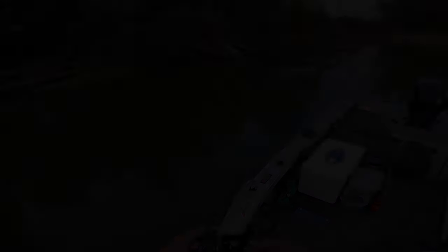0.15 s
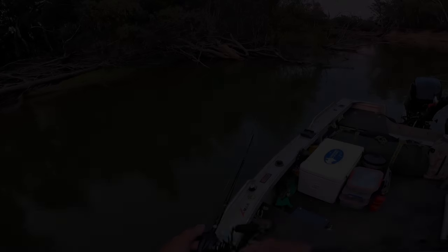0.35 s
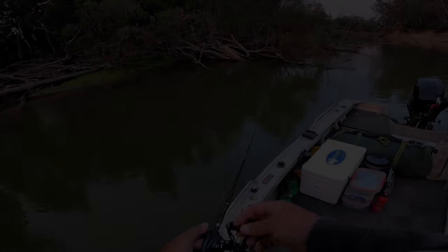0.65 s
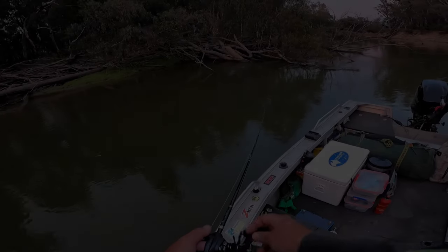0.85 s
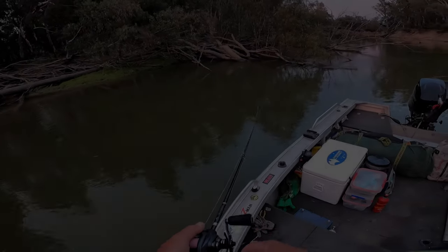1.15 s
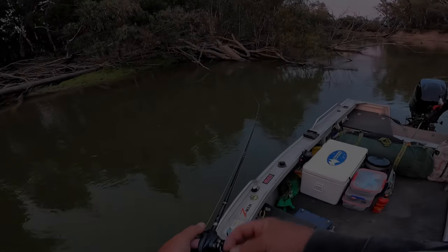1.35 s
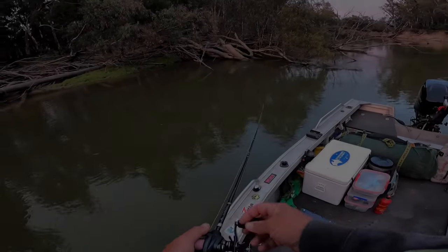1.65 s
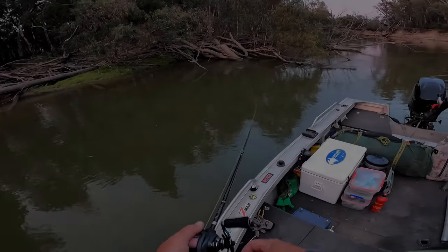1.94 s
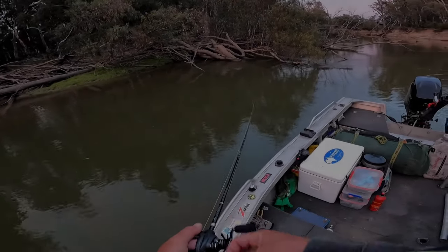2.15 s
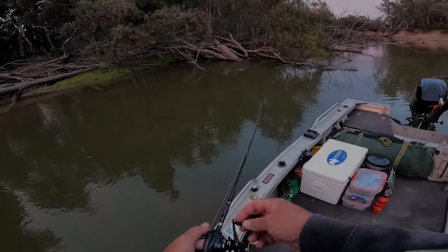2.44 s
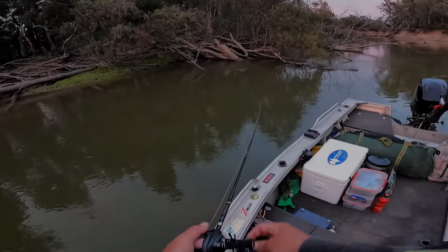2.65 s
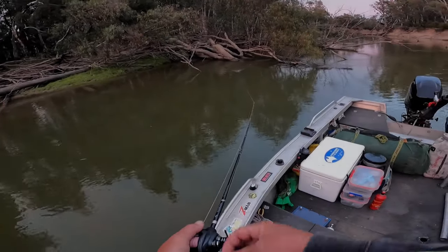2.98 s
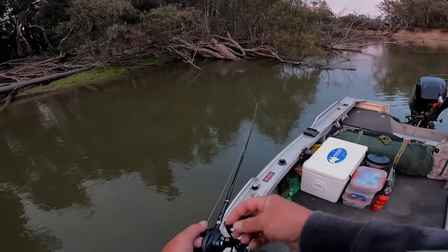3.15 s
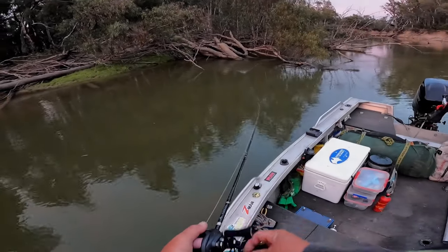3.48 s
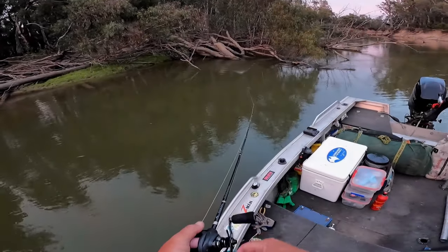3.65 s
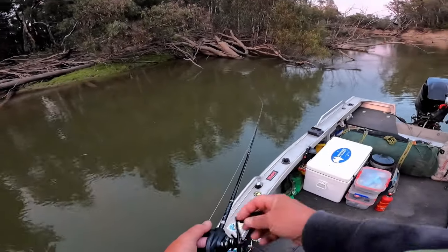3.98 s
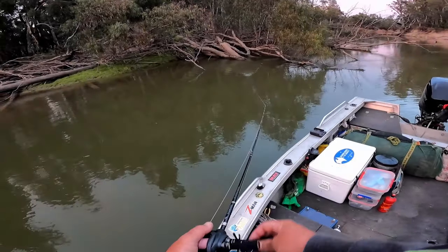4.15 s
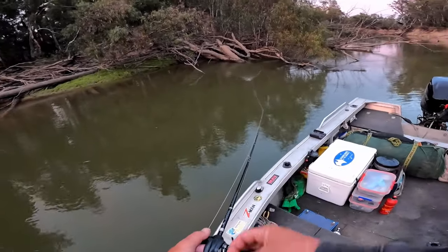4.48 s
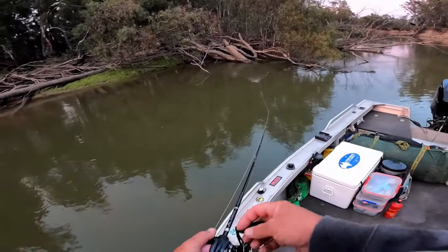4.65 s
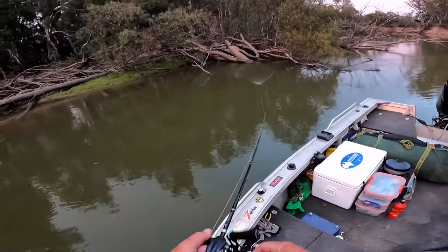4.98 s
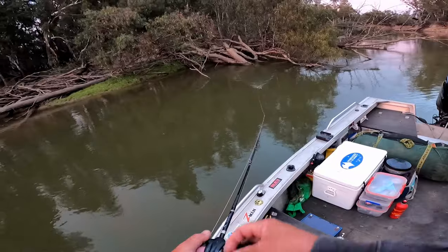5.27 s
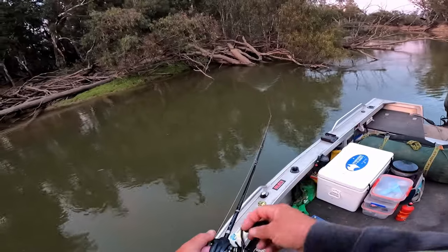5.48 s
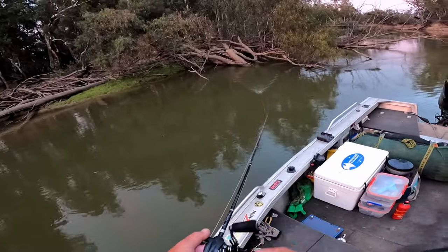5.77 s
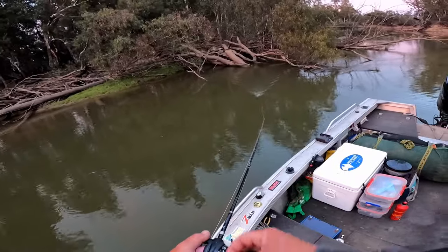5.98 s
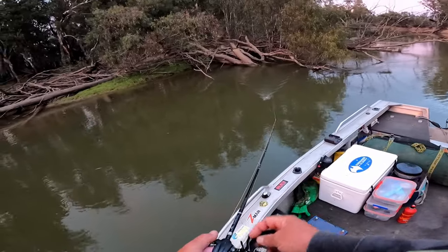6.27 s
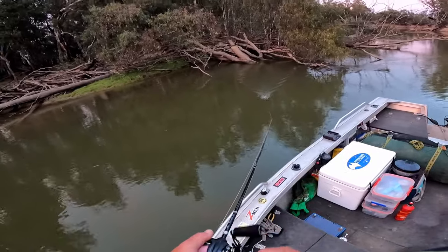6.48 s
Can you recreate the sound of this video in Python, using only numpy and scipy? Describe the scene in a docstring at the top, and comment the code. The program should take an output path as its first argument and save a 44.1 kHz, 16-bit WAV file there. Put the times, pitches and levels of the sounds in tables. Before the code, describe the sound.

A raucous dawn bird chorus rings along a wooded river, with dry reel clicks, soft hull plops, thin whistles and a small bird's rising pips.

```python
"""Dawn on a wooded river, heard from a small boat. From the start cockatoos screech and crows wail from
the banks, as rough or clear stacks of harmonics; the trees echo every call over a bed of shaped noise.
Close by, a fishing reel ticks in noise bursts, and soon ripples plop at the hull as ringing bubbles.
Later one bird whistles high up and another pipes a run of rising chirps, both as gliding tones. Noise
bursts make a sharp click, a dull bump of the boat and a ringing tap; a few falling chips come near the end."""
import sys
import numpy as np
from scipy import signal
from scipy.fft import rfft, irfft, next_fast_len
from scipy.io import wavfile
from scipy.ndimage import uniform_filter1d, map_coordinates

SR = 44100
rng = np.random.default_rng(int(sys.argv[2]) if len(sys.argv) > 2 else 0)


def to_wav(sig):
    """Store sig (one row per channel, or 1-D mono) as 16-bit WAV at the path in sys.argv[1].

    Samples outside -1..1 are clipped; the rate is SR.
    """
    pcm = np.clip(np.atleast_2d(sig), -1, 1) * 32767
    pcm = np.round(pcm).astype(np.int16)
    wavfile.write(sys.argv[1], SR, pcm.T)  # frames by channels


N = 291942

# throats of the screeching birds, FAR also of the distant crows: f/Hz, level/dB before levelling
HARSH = [(180, -72), (382, -13.5), (600, -19.5), (1180, -9.5), (1650, -5), (1950, 1.5), (2450, -0.5),
         (3330, -5), (3600, -4), (3900, -2), (4250, -10.5), (4750, -5), (5500, -14), (7240, -19),
         (14000, -56)]
RASPING = [(180, -69), (382, -25.5), (1250, -8), (1650, -3.5), (1860, 0.5), (2430, -0.5), (2700, -6),
           (3200, -9), (3800, -6), (4300, -12), (4900, -9), (7240, -24.5), (14000, -54)]
NASAL = [(180, -69), (350, -23), (700, -19), (986, -8.5), (1200, -15), (1950, 1.5), (2400, -8.5),
         (3740, -7.5), (4250, -12), (6580, -20.5), (14000, -66)]
FAR = [(300, -32), (600, -15), (850, -13.5), (1200, -2), (2370, 1.5), (3580, -6), (5300, -11.5),
       (7100, -29), (14000, -56)]
DULL = [(150, -40), (900, -14), (1250, 5), (1950, 4), (2400, -5.5), (3300, -10), (5700, -27), (14000, -48)]
SHRILL = [(650, -51), (1250, 2.5), (1570, -2), (2400, 8), (2900, 8), (3700, 3.5), (5300, -7), (14000, -54)]
THIN = [(700, -47), (1150, -4.5), (1550, -7), (2200, 2), (4300, -8.5), (5300, -6), (6300, -16.5),
        (14000, -54)]
# contours of the wails, scream and caws whose pitch is drawn point by point: t/s, pitch/Hz, level/dB
ARCHED_WAIL = [(.335, 648, -50), (.38, 665, -41.5), (.46, 648, -44), (.51, 621, -35), (.56, 584, -42)]
SCREAM = [(.57, 1010, -40), (.67, 971.4, -35), (.79, 1085, -31), (.88, 1131, -38.5), (.94, 1075, -32),
          (1.03, 1033, -31.5), (1.065, 990, -38)]
FALLING_CAW = [(1.062, 420, -36), (1.105, 402, -32), (1.18, 376, -42)]
LONG_WAIL = [(5.545, 639, -42), (5.605, 661.6, -45), (5.65, 639.4, -37.5), (5.69, 651, -38),
             (5.73, 642, -36), (5.81, 643.4, -35), (5.85, 617, -37), (5.94, 571, -38.5), (5.99, 552, -55)]
RISING_CAW = [(6.16, 357, -50), (6.23, 362.5, -43), (6.29, 370, -46), (6.36, 416, -37), (6.44, 424, -40.5),
              (6.49, 413, -64)]
# their throats: f/Hz, level/dB before levelling
WAIL_THROAT = [(200, -65), (640, -34), (1290, -12.5), (1930, -17.5), (2300, -6.5), (2580, 1.5), (2950, -4),
               (3220, -13.5), (3860, -13), (4500, -28), (5150, -20), (5800, -34), (7100, -25), (8500, -48)]
SCREAM_THROAT = [(250, -61), (1100, -15), (2100, 1), (3300, -8.5), (4500, -11.5), (5500, -20), (14000, -55)]
CAW_THROAT = [(150, -65), (380, -23), (1200, -18), (1480, -1.5), (1700, -6), (2050, -1), (2450, -11.5),
              (2950, -13), (3400, -10), (4500, -16.5), (7000, -47)]


def amp(db):
    """Turns decibels into a gain."""
    return 10 ** (np.asarray(db) / 20)


def unit(x):
    """Scales a signal to an average strength (rms) of 1."""
    return x / np.sqrt(np.mean(x ** 2) + 1e-20)


def read(points, hz):
    """Reads a table between its points, on a logarithmic frequency axis."""
    f, value = np.transpose(points)
    return np.interp(np.log(hz + 1), np.log(f + 1), value)


def colour(x, points):
    """Makes each frequency louder or softer by a table of f/Hz and level/dB."""
    hz = np.fft.rfftfreq(x.shape[-1], 1 / SR)
    return irfft(rfft(x) * amp(read(points, hz)), x.shape[-1])


def wander(size, rate_hz):
    """Smooth random drift of rms about 1: noise whose changes faster than the given rate are weakened."""
    n = next_fast_len(size + SR // 4)
    smoothing = 1 + (np.fft.rfftfreq(n, 1 / SR) / rate_hz) ** 4
    return unit(irfft(rfft(rng.standard_normal(n)) / smoothing, n))[:size]


def add(mix, s, sound, pan_db=0):
    """Adds a sound at a time in seconds; a positive pan_db makes the left louder than the right."""
    part = mix[:, max(round(s * SR), 0):][:, :len(sound)]
    part += amp([[pan_db / 2], [-pan_db / 2]]) * sound[:part.shape[1]]


def stack(hz, count):
    """Adds up equally strong harmonics, whole multiples of a pitch curve."""
    turns = np.cumsum(hz) / SR
    return sum(np.cos(2 * np.pi * (k * turns + rng.random())) for k in range(1, count + 1))


def glide(hz, slope, arch, size):
    """Pitch of a call: it slides through hz by the share slope and droops at both ends by the share arch."""
    u = np.linspace(-1, 1, size)
    return hz * (1 + slope * u / 2 - arch * u ** 2)


def bend(x, speed):
    """Plays a sound at a changing speed, so all its pitches and resonances slide together."""
    return map_coordinates(x, [np.cumsum(speed)], order=3, mode="mirror")


def effort(t, peak_s, swell_db, fade_db):
    """A screech starts quickly, swells to its peak, fades and is cut off."""
    swell_curve, fade_curve = 1.48, 0.99  # powers of time that shape the swell and the fade
    attack_s, release_s = 0.016, 0.016
    before = np.clip((peak_s - t) / max(peak_s - t[0], 1 / SR), 0, 1)
    after = np.clip((t - peak_s) / max(t[-1] - peak_s, 1 / SR), 0, 1)
    edges = np.minimum((t - t[0]) / attack_s, 1) * np.minimum((t[-1] - t) / release_s, 1)
    return edges * amp(-swell_db * before ** swell_curve - fade_db * after ** fade_curve)


def screeches(jitter_hz=240, rasp=0.24, rasp_hz=170, growl_ratio=.29):
    """An unsteady syrinx: shaking harmonics, low rattle and noise, in a throat that glides with the pitch."""
    # cockatoo screeches: start/s, loudest at/s, end/s, level at the loudest/dB, swell before/dB,
    # fade after/dB, pitch before the bend/Hz, glide/share, jitter/share, roughness/share of power,
    # left over right/dB, throat
    calls = [(-.02, 0.192, 0.32, -30, 3.5, 2.5, 931, -0.041, 0.036, 0.83, -1, RASPING),
             (0.288, .33, 0.64, -43, 7, -6.5, 1192, -0.048, 0.029, 0.55, -1, RASPING),
             (0.53, 0.888, 1.07, -29, 9, 3, 1000, 0.02, 0.013, 0.75, -0.5, HARSH),
             (1.2, 1.58, 1.785, -36, 11, -1, 985, 0.063, 0.03, 0.6, .5, NASAL),
             (2.17, 2.446, 2.96, -42.5, 4, 3.5, 1194, -0.013, 0.023, 0.73, 5.5, FAR),
             (3.585, 3.626, 3.84, -38, -1, 16, 648, -0.045, 0.025, 0.98, 0.5, DULL),
             (3.83, 3.99, 4.48, -38, 4.5, 11, 1183, -.07, 0.018, 0.79, -1, FAR),
             (4.469, 4.827, 5.21, -37, 10.5, 15, 1215, -0.023, 0.03, 0.85, 1, SHRILL),
             (5.16, 5.356, 5.72, -40, 6.5, 8.5, 1008, -.09, 0.01194, 0.98, -3, THIN),
             (6.059, 6.43, 6.57, -46, 6, 10, 859.5, 0.059, 0.031, 0.6, 1, FAR)]
    growl_share, growl_wander = .7, .6  # rattle's share of the roughness; its waver as a share of the jitter
    throb, throb_hz = .08, 9.2  # slow swelling of the loudness
    lurch, lurch_hz = .016, 22  # slow unsteadiness of the whole voice's pitch: share, rate
    out = np.zeros((2, N))
    for start, peak_s, end, db, swell_db, fade_db, pitch, slope, jitter, rough, pan_db, throat in calls:
        t = np.arange(start, end, 1 / SR)
        n = len(t)
        hz = pitch * np.ones(n)
        tone = stack(hz * (1 + jitter * wander(n, jitter_hz)), count=12)
        rattle_hz = growl_ratio * hz * (1 + growl_wander * jitter * wander(n, 34.46))
        rattle = stack(rattle_hz, count=36)
        parts = [tone, rattle, rng.standard_normal(n)]
        shares = np.clip([1 - rough, rough * growl_share, rough * (1 - growl_share)], 0, 1)
        voice = sum(np.sqrt(share) * unit(colour(part, throat)) for share, part in zip(shares, parts))
        voice = bend(voice, glide(0.98, slope, .05, n) * (1 + lurch * wander(n, lurch_hz)))
        voice = unit(voice * np.exp(rasp * wander(n, rasp_hz) + throb * wander(n, throb_hz)))
        call = amp(db) * voice * effort(t, peak_s, swell_db, fade_db)
        add(out, start, call[t >= 0], pan_db)
    return out


def wails(beak_octaves=0.11, jitter=0.00675, flutter=0.15):
    """Drawn-out crow notes: clean harmonics, those near the resonance of the open beak being lifted."""
    # crow wails: start/s, length/s, pitch/Hz, glide/share, arch/share, level of second harmonic/dB,
    # swell from start to end/dB, beak resonance/Hz, its boost/dB, brightness/dB per octave
    calls = [(0, 0.57, 590, -0.1, -0.005, -46.5, -6, 1200, 1.5, 1),
             (1.556, 0.21, 501, -0.024, 0.017, -51.5, 1, 1000, 14, -3),
             (1.949, 0.26, 622.4, 0.0071, 0.041, -53, 0, 1200, 14, 0),
             (2.79, 0.24, 609.5, 0.0036, 0.035, -49.5, 1.5, 1790, 14, 1.5),
             (3.679, 0.11, 595.4, 0.072, 0.0086, -45, -2, 1870, 7, 0.5),
             (3.77, 0.23, 627.4, -0.021, 0.028, -45.5, 7, 3410, 6, 3.5),
             (3.956, 0.086, 669, -0.0476, 0.0074, -43.5, -1, 2690, 8, 2),
             (4.03, 0.242, 586.6, -0.025, 0, -47.5, -8, 1197, 0.5, 3.5),
             (4.531, 0.41, 593.7, 0.0025, .008, -58, -1, 2370, 20, 0.5),
             (4.895, 0.08, 628, -0.11, 0.025, -46, 0, 2500, 18, 1.5),
             (5.165, 0.2, 551.7, -0.0905, 0.0049, -49.5, -3, 1100, 9, 1.5),
             (5.369, 0.2, 581.3, -0.049, 0.0011, -55.5, 4, 1750, 8, 7)]
    # resonances of the crow's throat: f/Hz, level/dB before levelling
    throat = [(300, -15), (600, -16), (850, -6), (1200, 3), (1800, -3), (2500, -6.5), (3800, -13),
              (4500, -13), (7200, -24.5), (8500, -60)]
    out = np.zeros((2, N))
    for start, length, hz, slope, arch, db, swell_db, beak_hz, boost_db, tilt_db in calls:
        n = int(length * SR)
        pitch = glide(hz, slope, arch, n) * (1 + jitter * wander(n, 98))
        partials = np.arange(1, 14)[:, None] * pitch
        octaves = np.log2(partials / beak_hz)
        beak_db = boost_db * np.exp(-.5 * (octaves / beak_octaves) ** 2)
        shape_db = read(throat, partials) + tilt_db * octaves + beak_db
        phase = 2 * np.pi * (np.cumsum(partials, 1) / SR + rng.random((len(partials), 1)))
        # row 1 is the second harmonic: all levels are relative to it
        voice = np.sqrt(2) * (amp(shape_db - shape_db[1]) * np.cos(phase)).sum(0)
        voice = voice * (1 + flutter * wander(n, 42))
        level = amp(db + swell_db * np.linspace(-.5, .5, n))
        add(out, start, voice * level * signal.windows.tukey(n, .28))
    return out


def far_crows(count=30, db=-58, hz=610, length_s=.45, spread=.06, waver=.004):
    """Many more crows wail far along the river, each a soft harmonic stack on its own wavering pitch."""
    out, n = np.zeros((2, N)), int(length_s * SR)
    for k, (late, high, slope) in enumerate(rng.uniform(-1, 1, (count, 3))):
        pitch = glide(hz * (1 + spread * high), spread * slope, .05, n) * (1 + waver * wander(n, 22))
        call = amp(db) * unit(colour(stack(pitch, count=8), FAR)) * signal.windows.hann(n)
        add(out, (k + late) * N / SR / count, call)
    return out


def trees(x, likeness=0.29):
    """Trunks on both banks scatter the calls into a thin, long echo, built from sparse random taps."""
    # how long the echo takes to fall by 60 dB: f/Hz, time/s
    fading = [(300, 0.99), (2000, 0.8), (6500, 0.93), (12000, 0.082)]
    taps = rng.standard_normal((2, SR)) * (rng.random((2, SR)) < 1500 / SR)  # about 1500 taps a second
    hz, t, z = signal.stft(taps + likeness * taps[::-1], SR, nperseg=256)
    tail = signal.istft(z * amp(-60 * t / read(fading, hz)[:, None]), SR, nperseg=256)[1]
    return signal.fftconvolve(x, tail / np.linalg.norm(tail[0]), axes=1)[:, :N]


def banks(x, count=4):
    """The echo fades in turn between several random tails, so its tone keeps changing."""
    turn = np.arange(N) / SR * 2 * np.pi * 2  # two rounds a second
    return sum(trees(x * np.maximum(np.cos(turn + 2 * np.pi * k / count), 0)) for k in range(count))


def bed(spectrum, db, patchy_db):
    """Diffuse noise that swells in small patches of time and pitch."""
    # how alike left and right are: f/Hz, likeness/share
    alike = [(100, 0.27), (400, 0.7), (1200, 0.89), (2400, 0.45), (4500, 0.72)]
    frames, hz = N // 512 + 5, np.fft.rfftfreq(2048, 1 / SR)
    a, b, c, d, patches = rng.standard_normal((5, frames, len(hz)))
    patches = uniform_filter1d(patches, size=7, axis=0)
    patches = unit(uniform_filter1d(patches, size=6, axis=1))
    same = np.clip(read(alike, hz), -1, 1)
    left = a + 1j * b
    right = same * left + np.sqrt(1 - same ** 2) * (c + 1j * d)
    z = np.array([left, right]) * amp(read(spectrum, hz) + patchy_db * patches)
    noise = signal.istft(z.transpose(0, 2, 1), nperseg=2048, noverlap=1536)[1][:, :N]
    return amp(db) * unit(noise)


def reel(t60=0.0066, gain_db=4, faint_per_s=28, faint_db=-57):
    """Dry ticks from the turning reel, with fainter ones from its gears between: short bursts of noise."""
    # the loudest ticks of the reel: t/s, peak level before gain_db/dB
    loud = [(.2872, -40), (1.3838, -43), (2.1864, -44.5), (2.5461, -43), (3.1507, -40.5), (3.1637, -49),
            (3.6601, -37), (3.758, -45), (3.8781, -47), (3.9055, -45), (4.1589, -42), (4.2467, -44),
            (4.8828, -45.5), (5.2016, -35), (5.4136, -45), (5.9663, -44), (6.0965, -42.5), (6.5091, -40.5)]
    # tone of every tick: f/Hz, level/dB before levelling
    tick_tone = [(500, -34), (2500, -30), (7000, 14.5), (12000, 1), (15500, -19)]
    out, t = np.zeros((2, N)), np.arange(2 ** 10) / SR
    lead = len(t) // 16  # samples left free ahead of the tick, as the filter spreads it both ways
    times = rng.uniform(0, N / SR, int(faint_per_s * N / SR))
    faint = [(s, faint_db + 3 * rng.standard_normal()) for s in times]
    for s, db in list(loud) + faint:
        burst = rng.standard_normal(len(t)) * amp(-60 * t / t60)
        tick = colour(np.roll(burst, lead), tick_tone)
        add(out, s - t[lead], tick / abs(tick).max() * amp(db + gain_db))
    return out


def cries(flutter=0.21, edge_s=0.013):
    """Wails, a scream and caws drawn point by point: harmonics bend through a throat and turn hoarse."""
    # calls drawn point by point: contour, throat, jitter before hoarseness widens it/share,
    # roughness at the start/share of power, roughness at the end/share of power, left over right/dB
    calls = [(ARCHED_WAIL, WAIL_THROAT, .004, .05, .2, 0), (SCREAM, SCREAM_THROAT, 0.0116, 0.13, 0.24, -.5),
             (FALLING_CAW, CAW_THROAT, 0.0042, .03, .12, 4),
             (LONG_WAIL, WAIL_THROAT, 0.0053, 0.027, 0.44, -1),
             (RISING_CAW, CAW_THROAT, 0.004, 0.19, 0.39, 1.5)]
    break_curve = 4  # power of time by which a cry turns hoarse
    out = np.zeros((2, N))
    for curve, throat, jitter, rough_start, rough_end, pan_db in calls:
        s, hz, db = np.transpose(curve)
        t = np.arange(s[0], s[-1], 1 / SR)
        n = len(t)
        progress = np.linspace(0, 1, n) ** break_curve
        rough = np.clip(rough_start + (rough_end - rough_start) * progress, 0, 1)
        pitch = np.interp(t, s, hz) * (1 + jitter * (1 + 2 * rough) * wander(n, 114))
        partials = np.arange(1, 14)[:, None] * pitch
        gains = amp(read(throat, partials))
        phase = 2 * np.pi * (np.cumsum(partials, 1) / SR + rng.random((len(partials), 1)))
        tone = np.sqrt(2) * (gains * np.cos(phase)).sum(0) / np.linalg.norm(gains, axis=0)
        tone = tone * (1 + flutter * wander(n, 35))
        breath = unit(colour(rng.standard_normal(n), throat))
        voice = np.sqrt(1 - rough) * tone + np.sqrt(rough) * breath
        edges = np.minimum(np.minimum(t - t[0], t[-1] - t) / edge_s, 1)
        add(out, s[0], voice * edges * amp(np.interp(t, s, db)), pan_db)
    return out


def hull(plop_db=-3, plop_t60=0.11, rise_per_s=2.2, swell_s=0.0029):
    """Bubbles ring and rise in pitch as ripples close on the hull; knocks are short filtered noise bursts."""
    # ripples plopping at the hull: t/s, peak level before plop_db and the final tone filter/dB,
    # starting pitch of the bubble/Hz
    plops = [(.617, -49, 443), (1.028, -47, 396), (1.313, -51, 415), (1.97, -49.5, 481),
             (2.676, -48.5, 440), (2.99, -51, 397.6), (5.197, -50.5, 450)]
    # a sharp click, a dull bump in two rows and a ringing tap: t/s, level at the onset before the
    # final tone filter/dB, centre f/Hz, width/octaves, time to fall by 60 dB/s
    knocks = [(3.589, -33.5, 1850, 1, 0.018), (4.368, -55, 550, 0.3, 0.24), (4.382, -51, 259.3, 1, 0.24),
              (5.494, -46, 1010, 0.11, 0.073)]
    # final tone of the hull sounds, duller towards the top: f/Hz, level/dB
    hull_tone = [(3000, 2.5), (6000, -10), (12000, -32)]
    out, t = np.zeros((2, N)), np.arange(8192) / SR
    for s, db, hz in plops:
        ring = np.sin(2 * np.pi * hz * t * (1 + rise_per_s * t / 2))
        bubble = ring * (1 - np.exp(-t / swell_s)) * amp(-60 * t / plop_t60)
        add(out, s, amp(db + plop_db) * bubble / abs(bubble).max())
    f = np.fft.rfftfreq(len(t), 1 / SR) + 1
    lead = len(t) // 32  # samples left free ahead of the knock, as the filter spreads it both ways
    for s, db, hz, octaves, t60 in knocks:
        body = 1 / (1 + (np.log2(f / hz) / octaves) ** 4)
        burst = np.roll(rng.standard_normal(len(t)) * amp(db - 60 * t / t60), lead)
        add(out, s - t[lead], irfft(rfft(burst) * unit(body)))
    return colour(out, hull_tone)


def whistle(hz, slope, arch, length, db, waver):
    """One nearly pure gliding note, with a slight random waver in pitch."""
    n = int(length * SR)
    pitch = glide(hz, slope, arch, n) * (1 + waver * wander(n, 150))
    tone = np.sqrt(2) * np.sin(2 * np.pi * np.cumsum(pitch) / SR)
    return amp(db) * tone * signal.windows.tukey(n, .7)


def small_birds():
    """Thin high whistles, upward slurs and fluttering, falling chips, all made of gliding pure notes."""
    # thin high whistles: start/s, length/s, pitch/Hz, glide/share, level/dB
    thin = [(2.04, 0.026, 4730, -0.06, -51), (2.358, 0.061, 6110, -0.035, -44.5),
            (2.574, 0.095, 6370, 0.04, -48), (2.702, 0.091, 5800, 0.028, -47),
            (2.936, 0.12, 5584, 0.017, -44), (4.082, 0.047, 6600, -0.013, -53),
            (5.38, 0.13, 5280, -0.012, -52.5)]
    # a second bird's upward slurs: start/s, length/s, pitch/Hz, level/dB
    slurs = [(3.32, 0.069, 2846, -45), (3.46, 0.083, 2786, -41.5), (5.169, 0.048, 2990, -44)]
    # falling two-part chips: t/s, level before that of each part is added/dB
    chips = [(5.925, -52), (6.102, -53.5), (6.162, -52.5)]
    # the parts of a chip: delay/s, length/s, pitch/Hz, glide/share, level added to the chip's/dB
    chip_parts = [(0, 0.04, 4700, -0.04, 3), (0.026, .042, 3870, -0.15, 7.5)]
    out = np.zeros((2, N))
    for s, length, hz, slope, db in thin:
        add(out, s, whistle(hz, slope, arch=0.0033, length=length, db=db, waver=0.0037))
    for s, length, hz, db in slurs:
        add(out, s, whistle(hz, slope=0.143, arch=0.012, length=length, db=db, waver=0.0333))
    for s, db in chips:
        for delay, length, hz, slope, part_db in chip_parts:
            note = whistle(hz, slope, arch=0.017, length=length, db=db + part_db, waver=.032)
            add(out, s + delay, note)
    return out


def pips(pan_db=4.0):
    """Rising pips: the first is high and long, then the run settles, flattens and fades."""
    # a small bird's run of pips, brisk and then slower: start/s, end/s, interval/s
    run = [(2.413, 3.26, .1308), (3.348, 4.63, .1516)]
    first_db, fade_db_per_s = -38, 2
    settled_hz, settled_s, rise_hz, flatten_per_s = 3200, 0.0286, 577, 0.2
    extra_hz, extra_s, settle_s = 370, 0.0193, 0.072  # added to the first pip; how fast that dies away
    out = np.zeros((2, N))
    times = np.concatenate([np.arange(*stretch) for stretch in run])
    for s, age in zip(times, times - times[0]):
        fresh = np.exp(-age / settle_s)
        hz = settled_hz + extra_hz * fresh
        length = settled_s + extra_s * fresh
        slope = rise_hz * np.exp(-flatten_per_s * age) / hz
        db = first_db - fade_db_per_s * age
        add(out, s, whistle(hz, slope, arch=0.039, length=length, db=db, waver=0.0026), pan_db)
    return out


def scene():
    """Adds up the birds with their echo, the far chorus and water, and the boat."""
    # distant chorus and air: f/Hz, level/dB before levelling
    air = [(20, -18), (100, -27), (160, -19.5), (340, -20), (560, -10.5), (810, -8.5), (1200, 0.5),
           (2150, -0.5), (3200, -3.5), (7300, -19.5), (12000, -47), (15500, -79)]
    # water along the hull: f/Hz, level/dB before levelling
    wash = [(20, -4.5), (115, -44), (155, 1), (300, -11.5), (550, -3), (1200, -37)]
    cockatoos, crows, drawn_calls = screeches(), wails() + far_crows(), cries()
    small, piping = small_birds(), pips()
    to_trees = amp(-6.5) * cockatoos + amp(-6.5) * crows + amp(-7.5) * drawn_calls
    to_trees = to_trees + amp(-5) * small + amp(-9.5) * piping
    birds = cockatoos + crows + drawn_calls + small + piping + banks(to_trees)
    background = bed(air, -46.0, patchy_db=5.5) + bed(wash, -65.5, patchy_db=4.5)
    return birds + background + reel() + hull()


def record(dry):
    """Two microphone ports slightly out of phase, then the band limit."""
    # how far left leads right: f/Hz, phase/radians
    port_phase = [(400, -.1), (1300, -.5), (2500, -1.15), (4200, -.3), (7000, -.3)]
    edge_hz = 15400  # the treble is cut off around here
    turn = np.exp(.5j * read(port_phase, np.fft.rfftfreq(N, 1 / SR)))  # half the lead on each side
    ports = irfft(rfft(dry) * np.array([turn, 1 / turn]), N)
    low_pass = signal.firwin(511, edge_hz, window=("kaiser", 9), fs=SR)
    return signal.oaconvolve(ports, low_pass[None], "same")


dry = scene()
out = record(dry)
to_wav(out)
```